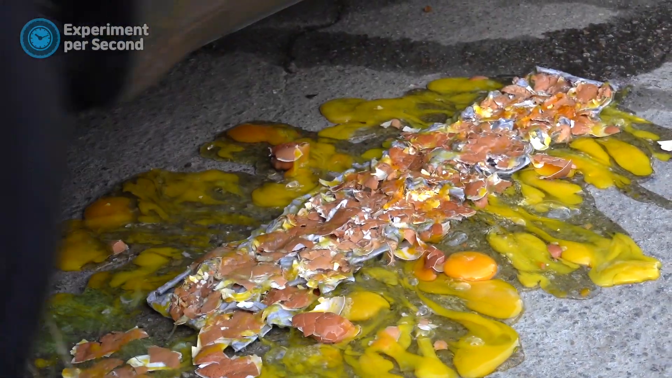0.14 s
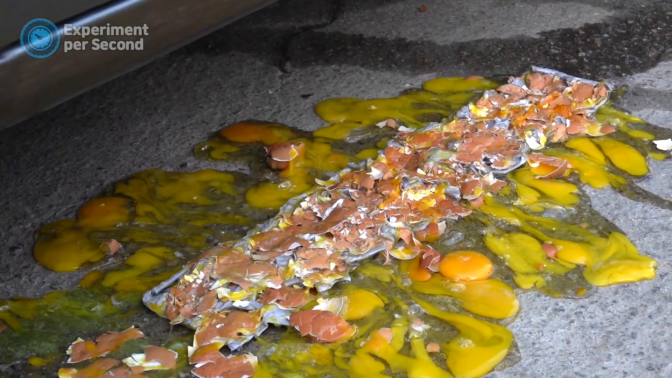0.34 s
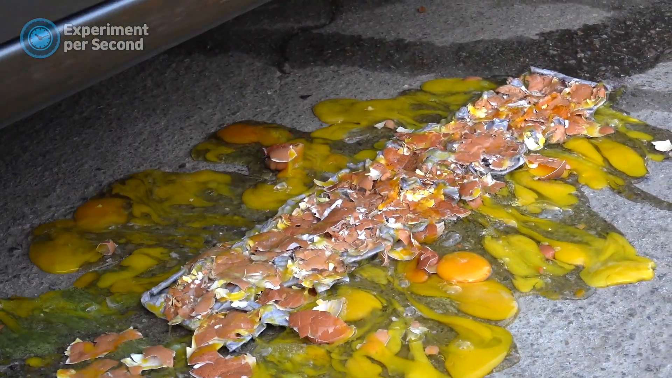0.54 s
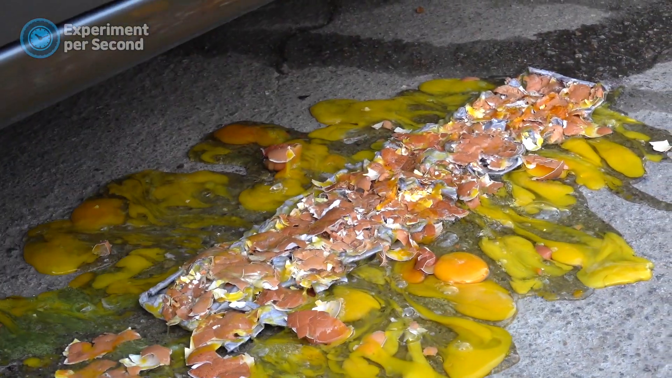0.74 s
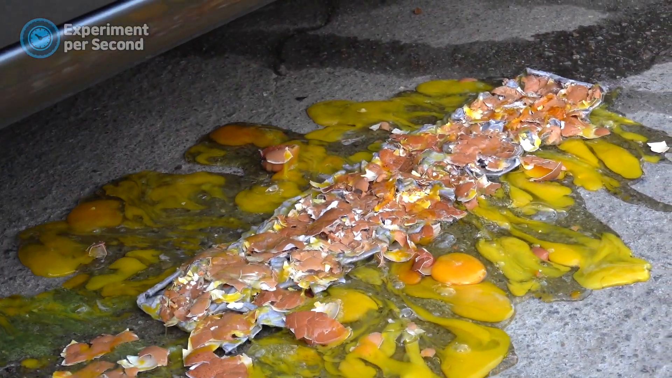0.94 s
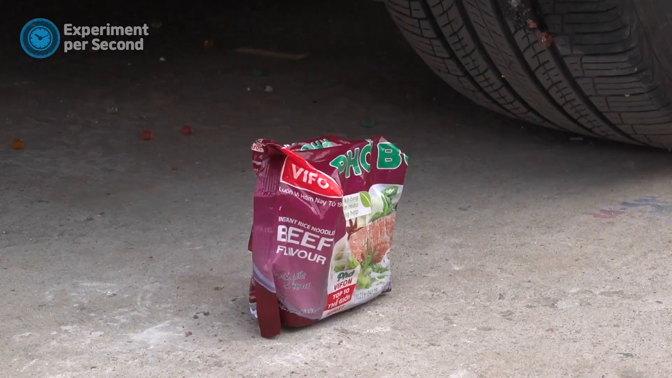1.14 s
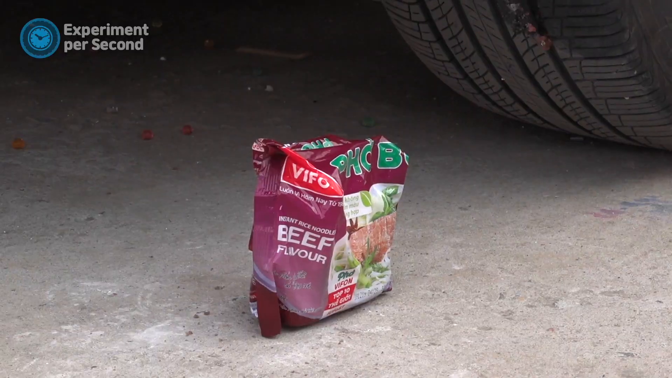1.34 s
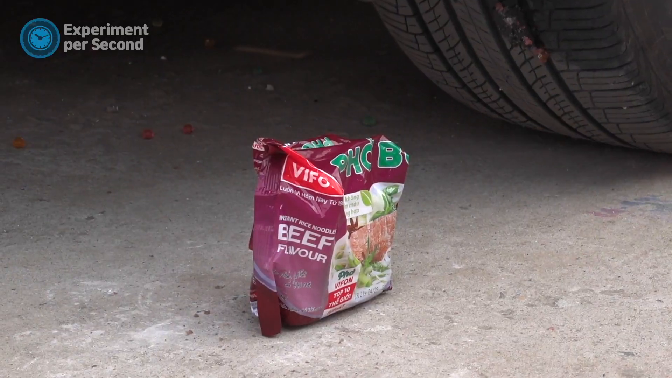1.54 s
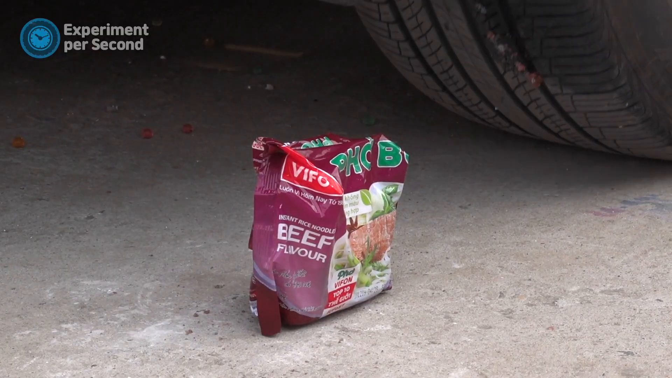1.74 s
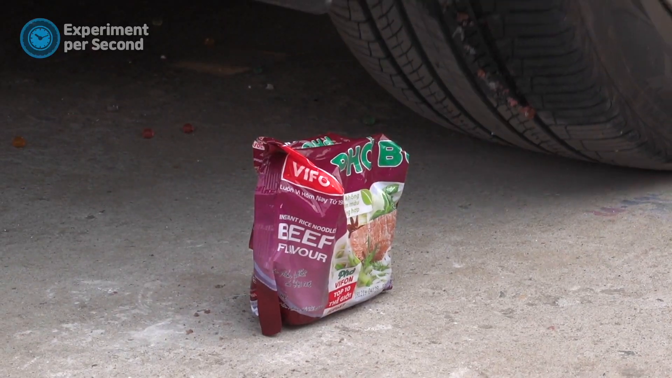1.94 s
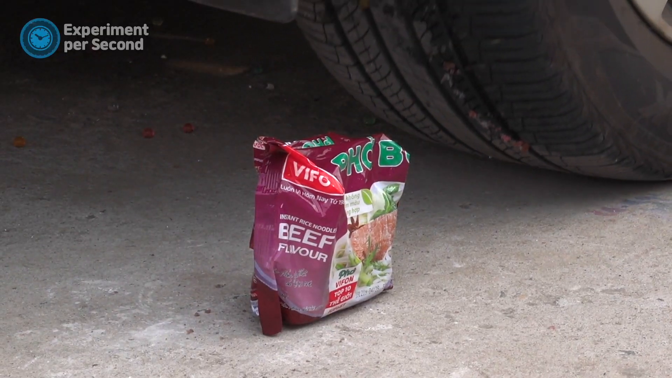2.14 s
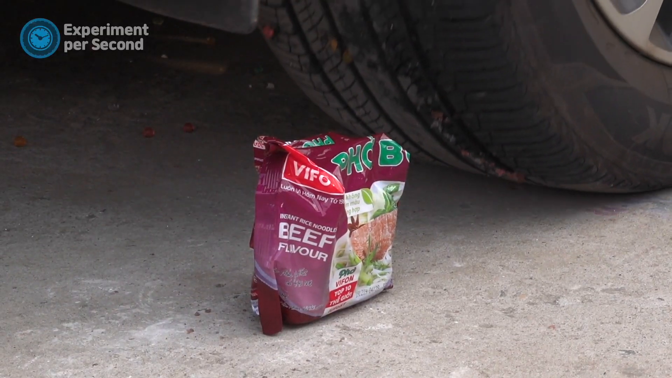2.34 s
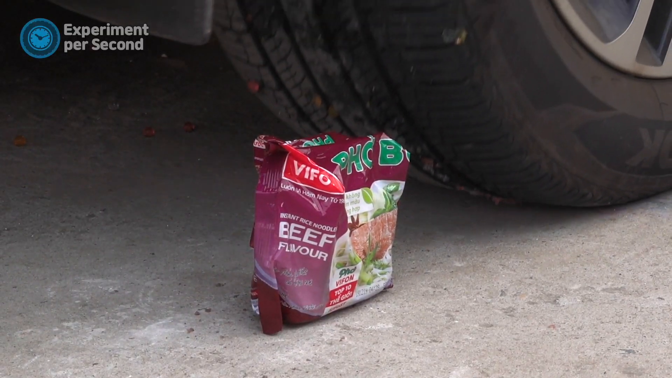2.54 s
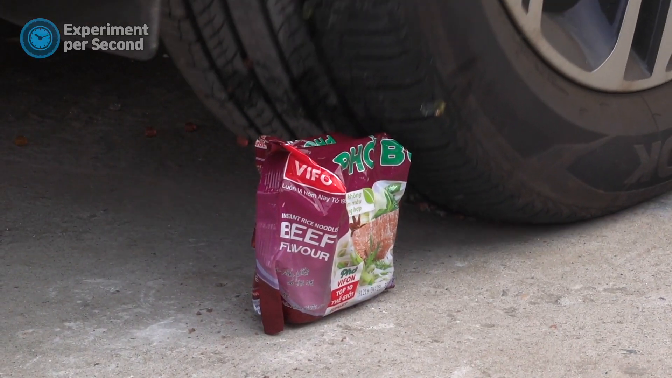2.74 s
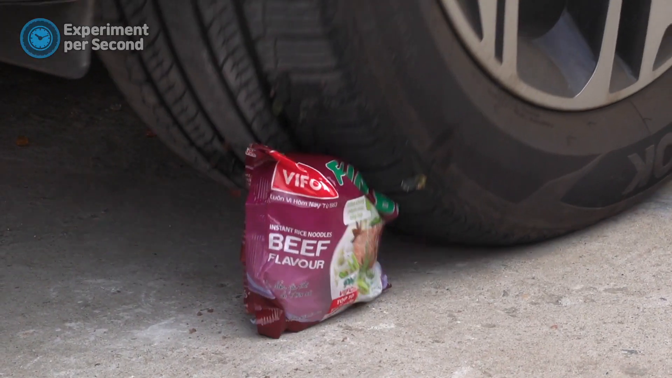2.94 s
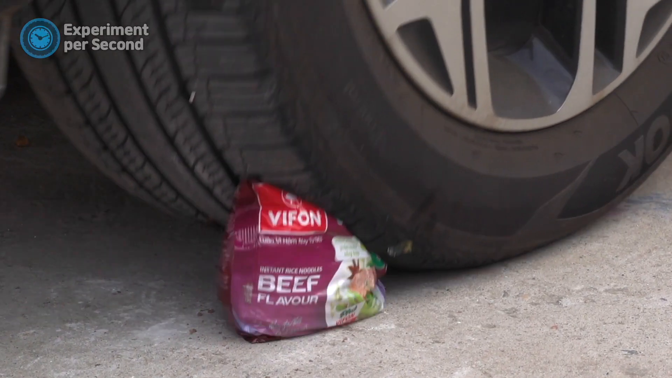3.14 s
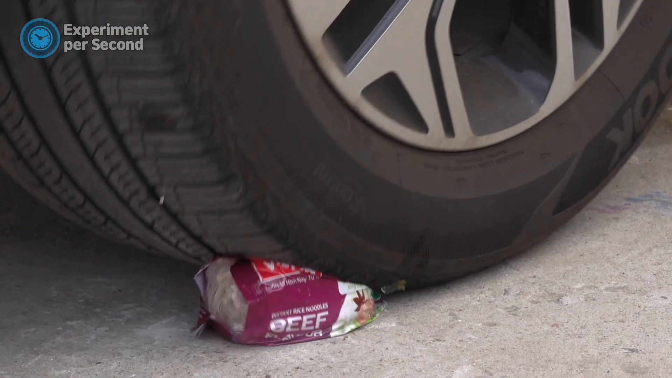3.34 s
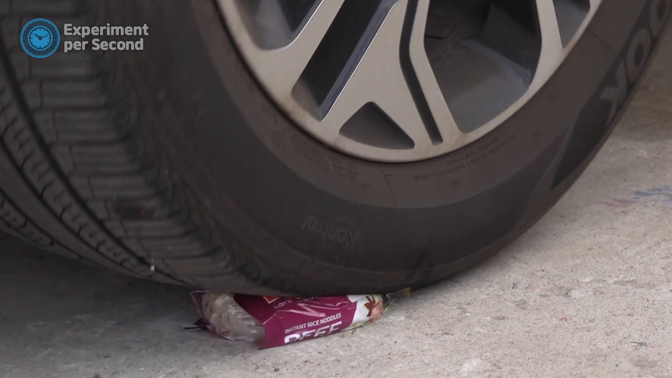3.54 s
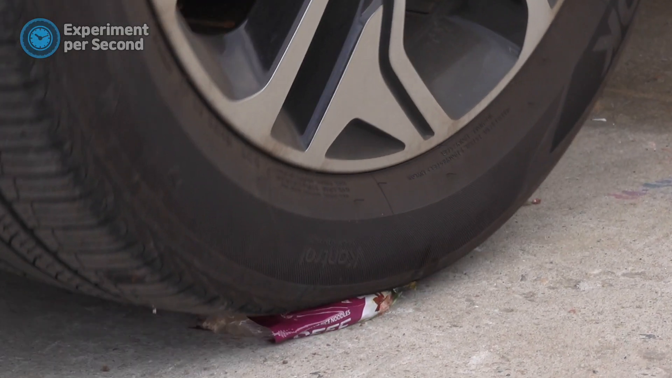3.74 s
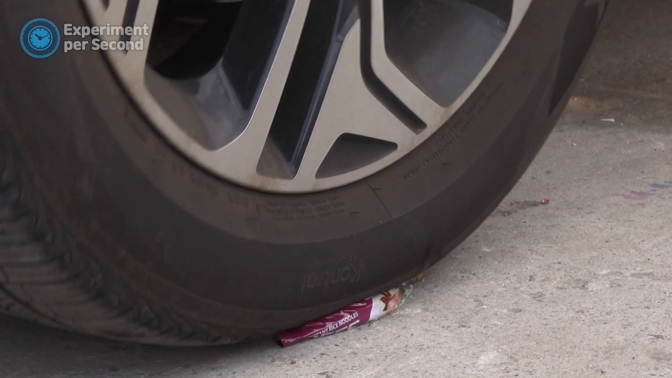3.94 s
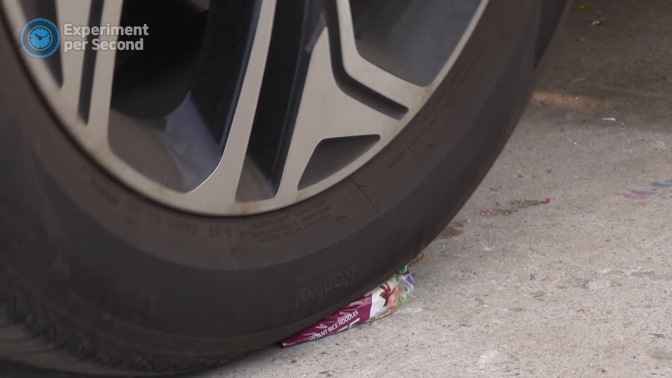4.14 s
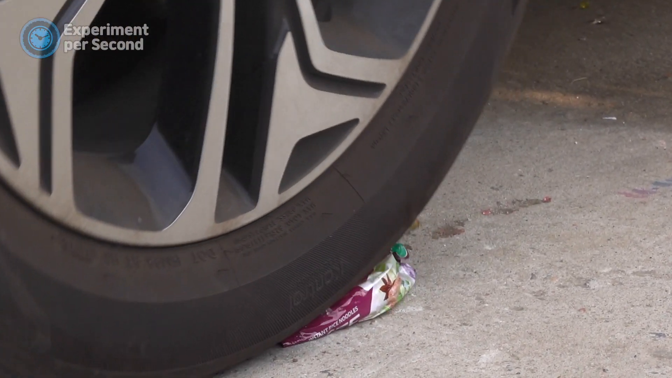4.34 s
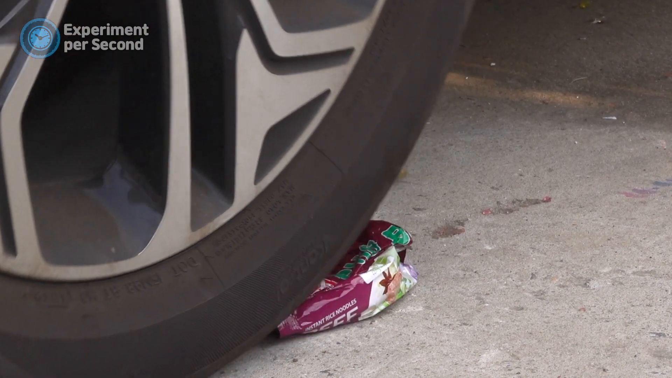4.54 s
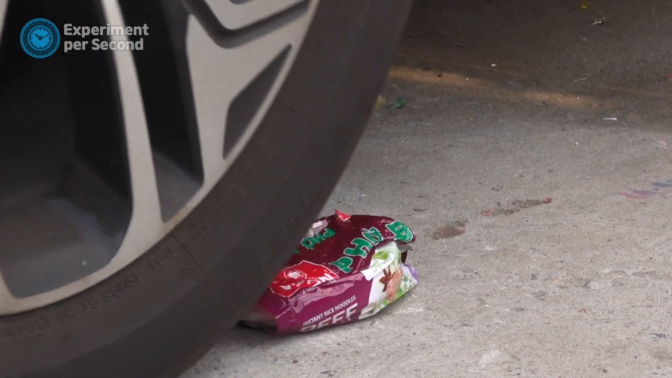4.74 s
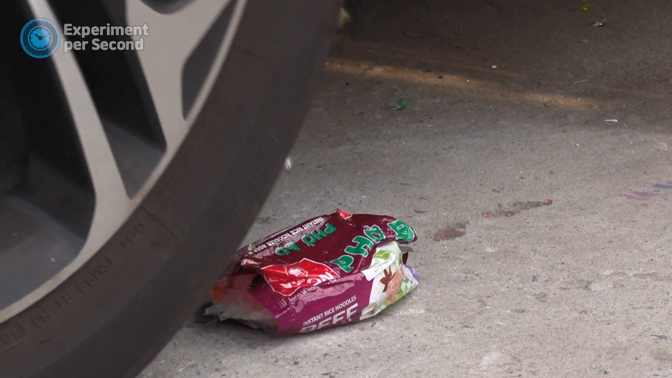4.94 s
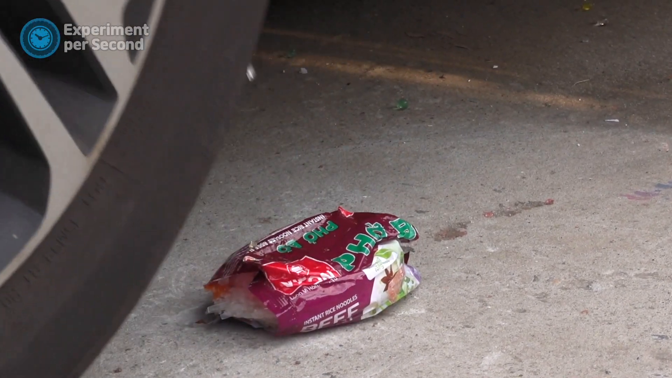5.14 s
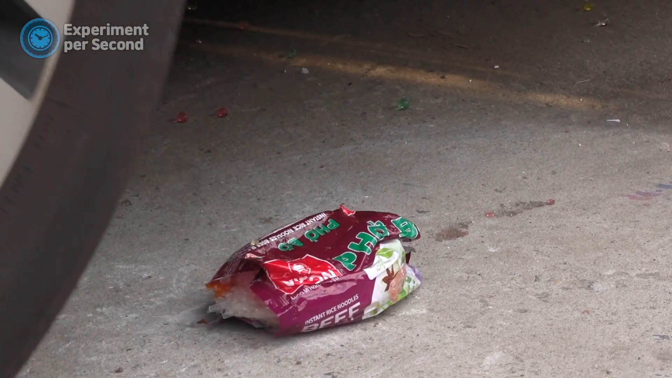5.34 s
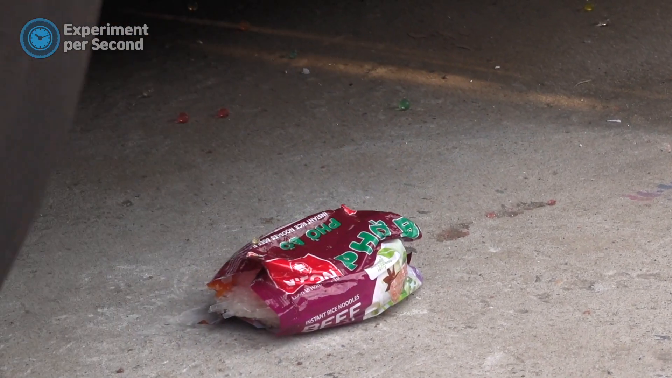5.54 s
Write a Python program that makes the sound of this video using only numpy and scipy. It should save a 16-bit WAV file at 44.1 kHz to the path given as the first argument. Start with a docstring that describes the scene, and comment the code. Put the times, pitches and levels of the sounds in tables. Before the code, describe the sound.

A car idles outdoors and fades, its tyre faintly crackling off crushed eggshells. The sound switches to a slower, knocking idle that grows as the car approaches. Close to the microphone, the tyre crushes a packet of dry noodles in a loud, dense crunch with crinkling foil. The last pieces snap one by one, a small stone ticks, and the engine fades away.

```python
"""A car crushes eggs and noodles

An idling car, its tyre close by, creeps over concrete, away from wet, crushed eggs. The scene then
switches: it rolls up to a packet of dry noodles and flattens it. The block crumbles in a dense crunch,
the foil wrapper crinkles, the last pieces snap one by one, and the knocking engine fades down."""
import sys
import numpy as np
from scipy import signal
from scipy.fft import rfft, irfft
from scipy.io import wavfile

SR = 44100
rng = np.random.default_rng(int(sys.argv[2]) if len(sys.argv) > 2 else 0)


def transcribe(signal):
    """Save signal, clipped to [-1, 1], as a 16-bit WAV file at the path in sys.argv[1]."""
    frames = np.atleast_2d(signal).T
    limited = np.clip(frames, -1, 1)
    pcm = np.round(limited * 32767).astype(np.int16)
    wavfile.write(sys.argv[1], SR, pcm)


N = 246519
TIME = np.arange(N) / SR
PEAK_S = 3.42  # when the noodles break fastest

# The dull tone of crumbling noodles. Each row: frequency in Hz, relative level in dB.
CRUMB_TONE = [(150, -16), (210, 1), (290, 1.5), (400, -8.5), (540, 1.5), (800, 2), (1250, -4.5), (1600, -4),
              (2200, -5.5), (4000, -21), (16000, -43)]
# The wedge of air between tyre and ground rings. Each row: pitch in Hz, width in Hz, strength in dB.
WEDGE_RINGS = [(544, 45, 7), (740, 23, -7), (966, 79, 1), (1110, 74, 3), (1470, 170, 4.5), (2420, 420, 0),
               (4400, 160, 1), (5300, 140, -11), (6050, 110, -4), (7560, 170, -2)]


def amp(db):
    """Turns decibels into a number to multiply a sound by."""
    return 10 ** (np.asarray(db) / 20)


def unit(x):
    """Scales a sound to an average power of 1."""
    return x / np.sqrt(np.mean(x ** 2) + 1e-20)


def ramp(start, end):
    """Goes steadily from 0 at start to 1 at end, forwards or backwards in time."""
    return np.clip((TIME - start) / (end - start), 0, 1)


def add(mix, start_s, sound):
    """Mixes a sound in at the given time."""
    part = mix[:, max(round(start_s * SR), 0):][:, :sound.shape[1]]
    part += sound[:, :part.shape[1]]


def response(tone, rings=(), size=4096):
    """How an object answers one click, given its overall tone and the pitches it rings at."""
    hz = abs(np.fft.fftfreq(size, 1 / SR))
    tone_hz, tone_db = np.transpose(tone)
    gain = amp(np.interp(np.log(hz + 1), np.log(tone_hz), tone_db))
    peaks = sum(amp(db) ** 2 / (1 + (2 * (hz - pitch) / width) ** 2) for pitch, width, db in rings)
    log_gain = np.log(gain * np.sqrt(1 + peaks) + 1e-5)
    spectrum = np.exp(np.conj(signal.hilbert(log_gain)))  # nothing sounds before the click
    answer = np.fft.ifft(spectrum).real[:size // 2]
    return answer / np.linalg.norm(answer)


def ring(x, answer):
    """Passes a sound through an object, given that object's answer to one click."""
    return signal.oaconvolve(np.atleast_2d(x), np.atleast_2d(answer), axes=1)[:, :x.shape[-1]]


def band(x, low_hz, high_hz):
    """Keeps one range of frequencies, at an average power of 1."""
    bandpass = signal.butter(4, [low_hz, high_hz], "band", fs=SR, output="sos")
    return unit(signal.sosfilt(bandpass, x))


def widen(pair, width):
    """Sets stereo width by frequency. A pair is mid (what both ears share) and side (how they differ)."""
    mid, side = pair
    hz, db = np.transpose(width)
    gain = amp(np.interp(np.log(np.fft.rfftfreq(N, 1 / SR) + 1), np.log(hz), db))
    return np.array([mid, irfft(rfft(side) * gain, N)])


def lean(pair, share):
    """Moves the treble off centre, to the left if share is positive; only short waves are shadowed."""
    mid, side = pair
    treble = signal.sosfilt(signal.butter(1, 600, "high", fs=SR, output="sos"), mid)
    return np.array([mid, side + share * treble])


def firings(speed):
    """Counts the engine's firings from the first time in a speed table."""
    times, per_s = np.transpose(speed)
    return np.cumsum(np.interp(TIME, times, per_s) * (TIME >= times[0])) / SR


def fades(levels, quiet_s, stretch):
    """Engine layers fade up steadily after quiet_s (stretch > 0), or down until quiet_s (stretch < 0)."""
    return [amp(quiet_db) + (amp(loud_db) - amp(quiet_db)) * ramp(quiet_s, quiet_s + stretch * length)
            for quiet_db, loud_db, length in levels]


def knocks(cycles, rise, decay, uneven_db):
    """Each firing jumps in loudness and falls back, no two alike; rise and decay are in cycles."""
    count, phase = np.divmod(cycles, 1)
    strength = amp(uneven_db * rng.standard_normal(256))[count.astype(int)]
    return unit(strength * (1 - np.exp(-phase / rise)) * np.exp(-phase / decay))


def engine_noise(knock, body, gains, steady):
    """Knocks stand above a steady rush, in three ranges: rumble, clatter and hiss."""
    ranges_hz = [(105, 500), (500, 4000), (4000, 20000)]
    out = np.zeros((2, N))
    for edges, gain, rush in zip(ranges_hz, gains, steady):
        pulsing = np.hypot(knock, rush) * rng.standard_normal((2, N))
        out += gain * band(ring(pulsing, body), *edges)
    return out


def exhaust_hum(cycles, tones, waver):
    """The exhaust hums at multiples of the firing rate, each tone a little unsteady."""
    times = np.arange(0, 6, 1 / 20)
    hum = np.zeros(N)
    for multiple, db in tones:
        smear = np.pi * multiple + 0.301 * multiple ** 2  # the pipe smears each pulse
        wobble = 1 + waver * np.interp(TIME, times, rng.standard_normal(len(times)))
        hum += amp(db) * wobble * np.cos(2 * np.pi * multiple * cycles + smear)
    return unit(hum)


def fractures(per_s, spread_db, hold_s):
    """Tiny breaks make random clicks of very unequal size, their power held even over hold_s."""
    clicks = (rng.random(N) < per_s / SR) * rng.choice([-1, 1], N)
    clicks = clicks * amp(spread_db * np.minimum(rng.exponential(1, N), 3.5))
    window = signal.windows.hann(int(hold_s * SR))
    power = abs(signal.oaconvolve(clicks ** 2, window / window.sum(), "same"))
    return clicks / np.sqrt(power + 1e-4)


def grains(clicks, decay_s):
    """Every click becomes a tiny puff of noise with a tone of its own."""
    keep = np.exp(-2 / (decay_s * SR))
    power = signal.lfilter([1 - keep], [1, -keep], clicks ** 2 + 1e-12)
    return np.sqrt(power) * rng.standard_normal((2, N))


def leaving_eggs():
    """The engine fades at a fast, smooth idle; the wet tread peels off the shells, softly crackling."""
    # Engine speed. Each row: time in seconds, firings per second.
    speed = [(0, 29.57), (.4, 30.38), (.8, 30.92), (1.13, 30.25)]
    # Hum, rumble, clatter and hiss. Each row: quiet level in dB, loud level in dB, relative fade time.
    levels = [(-49, -35.8, 0.46), (-50, -36.5, 0.43), (-51.5, -35.5, 0.63), (-60, -41, 1)]
    # Tone of the engine noise. Each row: frequency in Hz, relative level in dB.
    tone = [(59, -15), (100, -1), (119, -8), (143, -7), (373, -2), (415, -5), (854, -12), (1310, -15.5),
            (1420, -15), (3470, -20), (5900, -24), (11900, -31), (16000, -34)]
    # Panels that the engine shakes. Each row: pitch in Hz, width in Hz, strength in dB.
    panels = [(380, 60, -4), (1280, 120, 0)]
    # Exhaust tones. Each row: multiple of the firing rate, relative level in dB.
    hum_tones = [(1, -5), (2, 1), (3, -0.5), (4, -22), (5, -7.5), (6, -11.5), (8, -6.5)]
    # Reflections spread the engine wide. Each row: frequency in Hz, side gain in dB.
    width = [(60, -50), (130, -49), (290, -42), (640, -6), (1410, -7), (3100, -2), (6820, 2.5),
             (15000, -0.5)]
    cycles = firings(speed)
    hum_gain, *gains = fades(levels, quiet_s=0.91, stretch=-1.05)
    knock = knocks(cycles + 0.55, rise=0.22, decay=0.81, uneven_db=2)
    noise = engine_noise(knock, response(tone, panels), gains, steady=(1.1, 1.1, 1.6))
    peeling = grains(fractures(per_s=200, spread_db=2, hold_s=0.36), decay_s=0.00077)
    crackle = gains[1] * amp(-11.5) * band(peeling, 880, 3400)  # fades along with the clatter
    exhaust = hum_gain * exhaust_hum(cycles, hum_tones, waver=0.17)
    return lean(widen(exhaust + noise + crackle, width), share=0.14)


def cover_ping(cycles, hz, width_hz=55):
    """Each firing rings a metal cover on the engine: a short, slightly fuzzy ping."""
    drift = np.cumsum(rng.standard_normal((2, N)), axis=1) * np.sqrt(2 * np.pi * width_hz / SR)
    knock = knocks(cycles, rise=0.05, decay=0.56, uneven_db=0.8)
    return unit(knock * np.cos(2 * np.pi * hz * TIME + drift))


def passing_engine():
    """The engine knocks at a slow idle, heard first from ahead of the wheel, then from behind it."""
    # Engine speed. Each row: time in seconds, firings per second.
    speed = [(1.13, 25.18), (1.6, 26.78), (2.1, 26.65), (2.8, 26.25), (3.4, 26.31), (4, 26.43),
             (4.6, 26.29), (5.59, 26.37)]
    # Hum, rumble, clatter and hiss. Each row: quiet level in dB, loud level in dB, relative fade time.
    ahead_levels = [(-51, -34, 0.67), (-45.5, -33.5, 0.53), (-46, -31, 0.68), (-58, -38.5, 1)]
    behind_levels = [(-50.5, -34, 0.62), (-51.5, -35.5, 0.4), (-49.5, -32, 0.57), (-60, -41.5, 0.59)]
    # Tone of the engine from ahead and from behind. Each row: frequency in Hz, relative level in dB.
    ahead_tone = [(100, 3.5), (200, 0.5), (320, 0), (400, -9.5), (650, -3), (860, -15), (1300, -14.5),
                  (1900, -15), (2900, -18), (4000, -21), (6800, -23.5), (10500, -34.5), (16000, -35)]
    behind_tone = [(100, -8), (160, -6), (270, -2), (390, -8.5), (520, -4.5), (780, -8), (1000, -18.5),
                   (1400, -8.5), (2100, -16), (2900, -18), (4500, -28.5), (7000, -35.5), (11000, -43),
                   (16000, -44)]
    # Panels rung by each firing. Each row: pitch in Hz, width in Hz, strength in dB.
    panels = [(756, 74, -1.5), (1004, 39, 10), (1190, 35, 6), (2820, 190, 2), (3410, 42, 6.5),
              (4870, 130, -6), (8240, 330, -1)]
    # Exhaust tones. Each row: multiple of the firing rate, relative level in dB.
    hum_tones = [(1, -2.5), (2, 1.5), (3, 2), (4, -4), (5, -9.5), (6, -22), (7, -10.5), (8, -7)]
    # Reflections spread the engine wide. Each row: frequency in Hz, side gain in dB.
    width = [(60, -69), (130, -36), (290, -18), (640, -12.5), (1410, -10.5), (3100, -5), (6820, 0),
             (15000, 2)]
    cycles = firings(speed)

    hum_ahead, *gains = fades(ahead_levels, quiet_s=2.136, stretch=0.89)
    knock = knocks(cycles + 0.18, rise=0.06, decay=0.56, uneven_db=1.5)
    ahead = engine_noise(knock, response(ahead_tone, panels), gains, steady=(1.2, 0.65, 1.3))
    ahead += gains[1] * amp(-4) * cover_ping(cycles + 0.054, hz=1464)

    hum_behind, *gains = fades(behind_levels, quiet_s=5.043, stretch=-0.86)
    knock = knocks(cycles + 0.17, rise=0.08, decay=0.45, uneven_db=0.8)
    behind = engine_noise(knock, response(behind_tone, panels), gains, steady=(1.1, 0.42, 1))
    behind += gains[1] * amp(-8.5) * cover_ping(cycles + 0.022, hz=1405)

    passed = ramp(3.2, 4.1)
    noise = np.sqrt(1 - passed) * ahead + np.sqrt(passed) * behind
    hum_gain = (1 - passed) * hum_ahead + passed * hum_behind
    exhaust = hum_gain * exhaust_hum(cycles + 0.082, hum_tones, waver=0.14)
    blocked = ramp(3, 3.2) - ramp(4.02, 4.37)  # the wheel rolls in front of the engine, then clears it
    engine = amp(-6.5 * blocked) * (noise + exhaust)
    return lean(widen(engine, width), share=0.08 * passed)


def burst(decay_s, size=1500):
    """A puff of noise that dies away, with a total energy of 1 in both mid and side."""
    puff = rng.standard_normal((2, size)) * np.exp(-np.arange(size) / SR / decay_s)
    return puff / np.linalg.norm(puff, axis=1, keepdims=True)


def grit():
    """A soft knock opens the second scene; then small stones tick against the concrete."""
    # Stones under the tread. Each row: start in seconds, peak level in dB.
    stones = [(1.349, -48), (1.411, -47), (1.816, -39), (1.840, -41), (4.484, -21), (4.545, -31)]
    out = np.zeros((2, N))
    for start_s, db in stones:
        tick = band(burst(0.00093), 6600, 16000)
        add(out, start_s, amp(db) * tick / abs(tick).max())
    add(out, 1.138, amp(-46) * band(burst(0.006), 520, 850))
    return out


def snaps():
    """Big pieces of noodle split, then crack and ring briefly; collapsing layers crunch more dully."""
    # Single loud snaps. Each row: start in seconds, relative levels of the crack and its ring in dB.
    pieces = [(2.8844, -5, -41), (2.8944, -2.5, -36), (2.9457, -6.5, -27), (3.0312, -5, -37),
              (3.0434, -14, -24), (3.6975, -4, -22), (3.8025, -5, -23), (3.8643, -14, -21),
              (3.8775, -11, -29), (3.9014, -9, -19), (3.9178, -4, -17), (3.951, -7.5, -24),
              (4.0017, -5.5, -25), (4.0138, -19, -33), (4.0602, -3.5, -22), (4.0853, -3, -30),
              (4.1106, -5, -26), (4.1217, -1.5, -38), (4.143, -2.5, -21), (4.1474, -5, -38),
              (4.175, -6, -25), (4.1902, -0.5, -35), (4.2024, -2.5, -33), (4.2377, -5, -26),
              (4.2697, -5.5, -17), (4.276, -8, -31), (4.2817, -6, -38), (4.2992, -6, -25),
              (4.364, -7, -19.5), (4.3883, -8.5, -43), (4.581, -12.5, -40)]
    # The bright tone of a crack. Each row: frequency in Hz, relative level in dB.
    crack_tone = [(300, 10), (1000, 6), (2500, 3), (4000, 4), (7000, 3.5), (11000, 2.5), (16000, -6)]
    # Whole layers of the block give way. Each row: start in seconds, relative level in dB.
    collapses = [(3.117, -12), (3.176, -7), (3.236, -6.5), (3.254, -12.5), (3.27, -8.5), (3.85, -10),
                 (4.034, -8), (4.057, -12.5), (4.08, -16), (4.139, -18), (4.203, -15.5)]
    bright, hollow = response(crack_tone), response(CRUMB_TONE, WEDGE_RINGS)
    out = np.zeros((2, N))
    for start_s, crack_db, body_db in pieces:
        crack = amp(crack_db + 4) * ring(burst(0.0008) + 0.86 * burst(0.003), bright)
        body = amp(body_db + 14) * ring(burst(0.00085), hollow)
        split = amp(crack_db - 2.5) * ring(burst(0.00046), bright)
        add(out, start_s, split)
        add(out, start_s + 0.001185, crack + body)
    for start_s, db in collapses:
        add(out, start_s, amp(db + 14.5) * ring(burst(0.0087), hollow))
    return out


def crushing(sag_db_per_s, release_db_per_s=125):
    """Each squeeze of the tyre rises, holds and lets go, sounding weaker as less is left to break."""
    # The tyre flattens the block, then pinches its edge as it rolls off.
    # Each row: start, rise time and moment of letting go in seconds, relative level in dB.
    squeezes = [(2.918, 0.18, 4.08, -0.5), (4.254, 0.013, 4.293, -2)]
    pressure = sum(amp(db - release_db_per_s * np.maximum(TIME - end, 0)) * ramp(start, start + rise)
                   for start, rise, end, db in squeezes)
    return pressure * amp(-sag_db_per_s * np.maximum(TIME - PEAK_S, 0))


def crunch():
    """Brittle noodles crumble and splinter under the tread while the foil around them crinkles."""
    # Tones of sharp splinters and of thin foil. Each row: frequency in Hz, relative level in dB.
    splinter_tone = [(500, -12), (1400, -10), (2000, -3.5), (2700, 0), (3500, -4.5), (4800, -7),
                     (6500, -19.5), (16000, -26)]
    foil_tone = [(500, -30), (2500, -4), (4300, -1.5), (6500, 1), (9000, -1), (12500, -1.5), (16000, -4.5)]
    breaks_per_s = 650 + 3600 * np.exp(-((TIME - PEAK_S) / 0.28) ** 2)
    breaks = fractures(breaks_per_s, spread_db=4, hold_s=0.061)
    creases = fractures(breaks_per_s * 0.6, spread_db=5, hold_s=0.23)
    crumbs = ring(grains(breaks, decay_s=0.0012), response(CRUMB_TONE, WEDGE_RINGS))
    splinters = ring(grains(breaks, decay_s=0.0011), response(splinter_tone, WEDGE_RINGS))
    crinkles = grains(0.79 * breaks + 0.73 * creases, decay_s=0.0005)
    foil = ring(crinkles, response(foil_tone, WEDGE_RINGS))
    # The wrapper rustles lightly from the first touch until it has unfolded behind the tyre.
    rustle = amp(-29.5) * (TIME > 2.89) * (1 - ramp(4.06, 4.85)) ** 2
    return (amp(-25) * crushing(sag_db_per_s=6) * crumbs
            + amp(-24) * crushing(sag_db_per_s=8.5) * splinters
            + np.hypot(amp(-22) * crushing(sag_db_per_s=9), rustle) * foil)


def underbody_echo(x):
    """Sound bounces briefly between the ground and the floor of the car."""
    return x + amp(-15) * ring(x, burst(decay_s=0.01, size=8000))


def scene():
    """Eggs first, then noodles: a wide engine around the close, nearly central packet, in stereo."""
    # The close packet sounds narrow. Each row: frequency in Hz, side gain in dB.
    packet_width = [(130, -40), (350, -39), (700, -22), (1400, -15.5), (2800, -11), (5000, -7.5),
                    (9000, -16), (15000, -15)]
    switch_s = 1.13
    second_scene = ramp(switch_s, switch_s + 0.004)
    car = (1 - second_scene) * leaving_eggs() + second_scene * passing_engine()
    packet = underbody_echo(crunch() + snaps()) + grit()
    mid, side = car + lean(widen(packet, packet_width), share=-0.039)
    return np.array([mid + side, mid - side])


def record(dry):
    """Rounds off the very highest peaks, then removes the topmost treble."""
    ceiling, top_hz = 0.8, 16100
    rounded = dry / (1 + (dry / ceiling) ** 4) ** 0.25
    lowpass = signal.firwin(511, top_hz, window=("kaiser", 9), fs=SR)
    return signal.oaconvolve(rounded, lowpass[None], "same")


dry = scene()
out = record(dry)
transcribe(out)
```